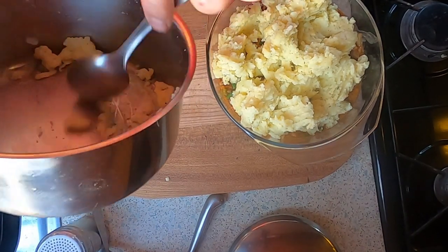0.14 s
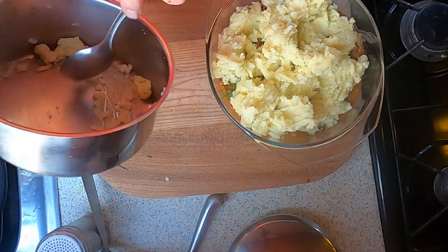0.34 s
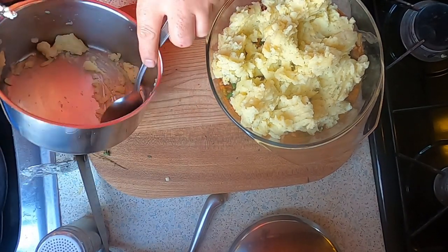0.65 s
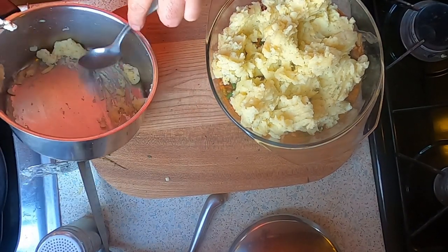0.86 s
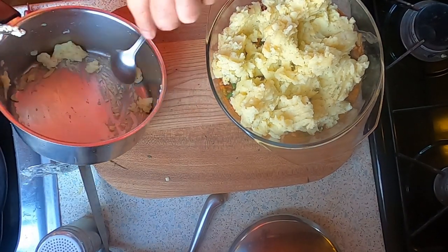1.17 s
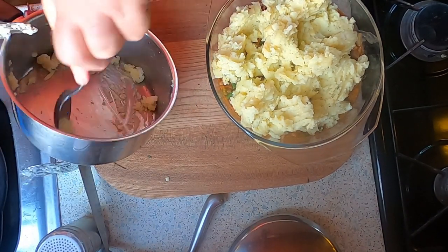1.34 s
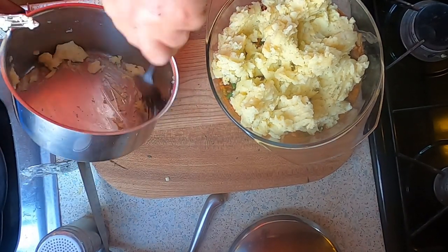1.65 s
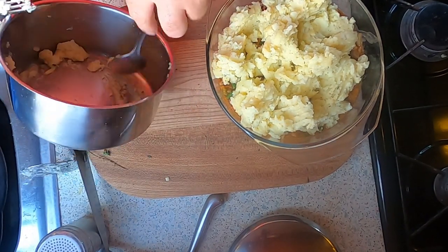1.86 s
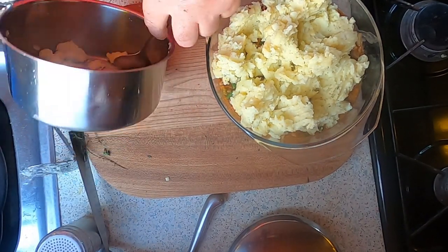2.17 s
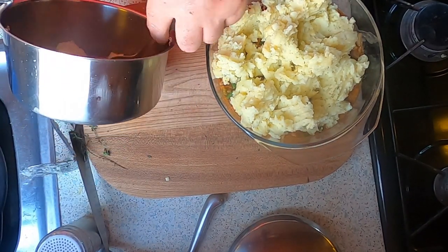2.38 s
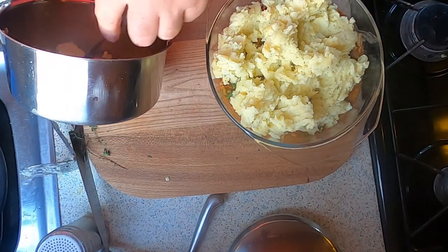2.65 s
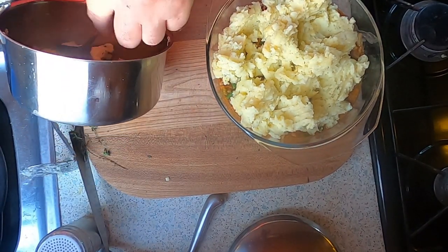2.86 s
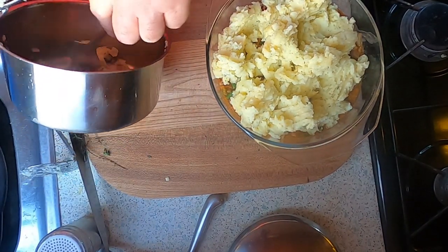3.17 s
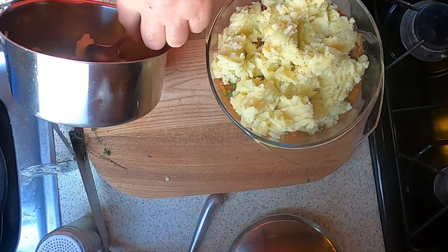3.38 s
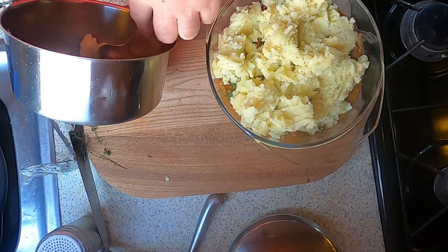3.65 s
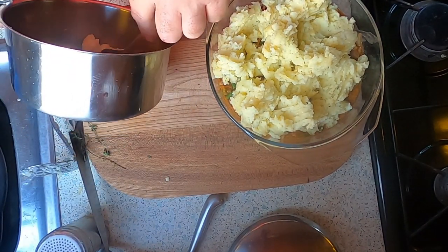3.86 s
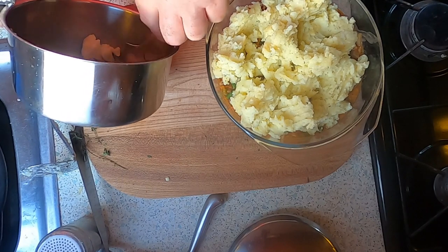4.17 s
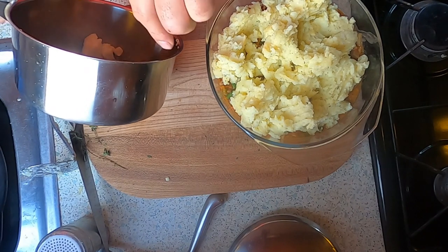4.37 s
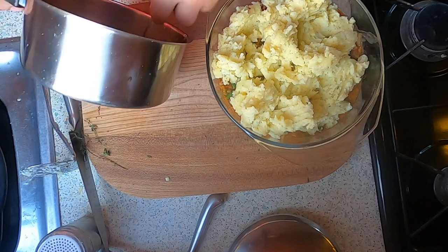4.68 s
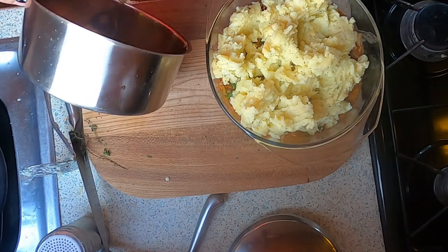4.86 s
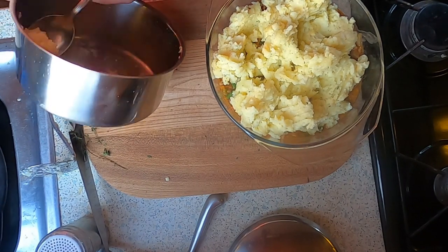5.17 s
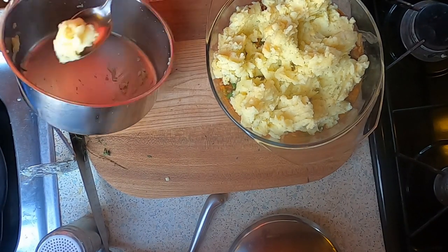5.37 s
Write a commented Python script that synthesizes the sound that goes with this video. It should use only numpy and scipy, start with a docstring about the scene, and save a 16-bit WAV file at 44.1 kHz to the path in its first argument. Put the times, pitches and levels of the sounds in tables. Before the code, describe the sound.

A metal spoon scrapes mashed potato from a steel saucepan in repeated short gritty strokes, with sharp clacks, faint squeals and dull thuds on a wooden board.

```python
"""A small kitchen: close by, a steel spoon scrapes mashed potato out of a steel saucepan on a wooden board.
Most strokes land with a clack, then drag over the metal: tiny random slips drive the damped pan's resonances.
The spoon's bowl sings in gliding narrow bands, blows ring the pan, and the board thuds under its weight.
The rim rings on faintly, the room returns a short echo, and a low rumble and faint air lie under it all."""
import sys
import numpy as np
from scipy import signal
from scipy.fft import rfft, irfft
from scipy.io import wavfile
from scipy.ndimage import uniform_filter1d, map_coordinates

SR = 44100
rng = np.random.default_rng(int(sys.argv[2]) if len(sys.argv) > 2 else 0)


def generate_wav(sig):
    """Save sig (samples, or channels by samples) to the path in sys.argv[1] as 16-bit PCM at SR."""
    pcm = np.round(np.clip(np.atleast_2d(sig).T, -1, 1) * 32767).astype(np.int16)
    wavfile.write(sys.argv[1], SR, pcm)


N = 243564
TIME = np.arange(N) / SR
TAIL = TIME[:SR // 7]  # time within one answer of the pan
LEFT_RIGHT = np.array([[1], [-1]])
LEAN_LEFT = 10 ** (1.2 * LEFT_RIGHT / 20)  # 1.2 dB up on the left, down on the right


def undb(db):
    """Decibels to gain."""
    return 10 ** (np.asarray(db) / 20)


def unit(x):
    """Scale to rms 1."""
    return x / np.sqrt(np.mean(x ** 2))


def noise(points, size):
    """Noise whose spectrum follows (Hz, dB) points, joined over log frequency."""
    hz, db = np.transpose(points)
    f = np.maximum(np.fft.rfftfreq(size, 1 / SR), 1)
    gain = undb(np.interp(np.log(f), np.log(hz), db))
    return irfft(rfft(rng.standard_normal(size)) * gain, size)


def band(x, lo_hz, hi_hz, order=3):
    """Causal band-pass."""
    return signal.sosfilt(signal.butter(order, [lo_hz, hi_hz], "band", fs=SR, output="sos"), x)


def walk(rate_hz, size):
    """Smooth random wandering, spread 1."""
    k = int(SR / rate_hz)
    steps = rng.standard_normal(size // k + 2)
    return unit(uniform_filter1d(np.repeat(steps, k), k))[:size]


def ring(push, response):
    """Play a force through a stereo response."""
    return signal.fftconvolve(np.atleast_2d(push), response, axes=1)[:, :push.shape[-1]]


def add(out, x, s):
    """Mix x into out from time s."""
    i = max(int(s * SR), 0)
    out[..., i:i + x.shape[-1]] += x[..., :N - i]


def delayed(x, seconds):
    """Read x late by a fixed or moving time."""
    return map_coordinates(x, [np.arange(N) - seconds * SR], order=3)


# Drags of the spoon, and at 0.605 s a short slide of the pan on the board.
# Each row: touch in seconds, swell in seconds, length in seconds, level in dB at full
# pressure, level in dB when easing off, grit in dB and weight on the base in dB (both on top of the drag),
# squeal start in Hz, squeal end in Hz, then the squeal and its lower partials in dB relative to the drag,
# before squeal() lifts both by 1 dB.
STROKES = [(0.103, 0.039, 0.19, -40, -36, -6.5, -18.5, 4750, 5450, -5.5, -12.5),
           (0.605, .02, 0.072, -39.5, -43.5, -9, 6.5, 5500, 5500, -18, -21),
           (0.691, 0.028, .2, -40.5, -34.5, -6, -13.5, 5650, 5050, -10.5, 3.5),
           (1.093, 0.024, .12, -36.5, -29, -6.5, -15, 5550, 5400, -23, 1.5),
           (1.473, 0.016, .15, -27.5, -30.5, -8, -14, 5750, 5200, -30, -1.5),
           (1.62, 0.061, 0.14, -36, -33.5, -5.5, -10.5, 5500, 6300, -13, -20),
           (1.775, 0.0091, 0.12, -38, -49.5, -4, -4, 5500, 5400, -24, -27),
           (2.04, 0.018, 0.13, -46.5, -34.5, -4, -14.5, 5500, 5400, -17, -8.5),
           (2.394, 0.061, 0.12, -32, -36, -2.5, -16, 5580, 5250, -7.5, -15),
           (2.749, 0.011, 0.084, -28, -31, -7.5, -15.5, 5780, 5500, -11.5, -14),
           (3.053, 0.017, 0.12, -31.5, -30.5, -8.5, -10, 5350, 5500, -4, -7.5),
           (3.346, 0.051, .11, -34.5, -36, -3, -18, 5500, 5630, -6, -12),
           (3.596, 0.073, 0.11, -33.5, -28.5, -3.5, -23, 5700, 5250, -9, -9),
           (3.891, 0.041, 0.078, -31, -26, -6, -17, 5700, 5250, -2.5, -8),
           (4.144, 0.035, .12, -35, -27.5, -2.5, -20.5, 5600, 5270, -9, -13),
           (4.452, 0.0054, 0.13, -24.5, -33.5, -4.5, -6.5, 5600, 5400, -19, -10),
           (4.571, 0.09, .36, -32.5, -36, -5.5, -9.5, 5300, 5540, -16.5, -11),
           (4.92, 0.046, .22, -30.5, -35.5, -6.5, -13, 5390, 5590, -14.5, -11.5),
           (5.158, 0.078, 0.075, -39, -40.5, 1, -13.5, 5500, 5500, -20, -20)]


def scrapes(force, uneven_db=2.01, press_db=18.5, release_db_per_s=324, lift_s=.16):
    """Each drag or slide presses in, gains grit and lets go; its squeal is strongest midway."""
    slow_grit_db, grit_fade_db_per_s = -8.5, 93  # less grit at the start; grit goes first on lifting
    base_linger_db_per_s = 74  # the base fades that much more slowly than the wall
    out = np.zeros((2, N))
    for (touch, swell, length, full_db, ease_db, grit_db, weight_db,
         start_hz, end_hz, top_db, lower_db) in STROKES:
        t = TIME[:int((length + lift_s) * SR)]
        lifted = np.maximum(t - length, 0)  # seconds since the lift
        travel = np.minimum(t / length, 1)
        press = np.interp(t, [0, min(swell, length), length], [full_db - press_db, full_db, ease_db])
        unevenness = uneven_db * walk(27, SR)[:len(t)]
        pressure = undb(press - release_db_per_s * lifted + unevenness)
        grit = grit_db + slow_grit_db * (1 - travel) ** 2 - grit_fade_db_per_s * lifted
        drag = np.roll(force, -int(touch * SR))[:len(t)] * pressure
        add(out, rub(drag, grit, weight_db + base_linger_db_per_s * lifted), touch)
        arch = np.sqrt(np.abs(np.sin(np.pi * travel)))
        song = squeal(start_hz + (end_hz - start_hz) * travel, top_db, lower_db)
        add(out, song * pressure * arch, touch)
    return out


def friction(edge_s=0.0013874, edge_travel=0.07, edge_echo=0.4, wall_s=.0037, wall_travel=.025,
             wall_echo=0.3, snag_rate_hz=70, snag_db=-5):
    """Slips, judder and the odd harder snag of the spoon's edge, with short gliding echoes; rms 1."""
    grip = 0.25 * undb(4.24 * walk(16, N))  # how firmly the edge catches
    snags = unit(rng.uniform(-1, 1, N) * (rng.random(N) < snag_rate_hz / SR))
    force = slips(rate_hz=1800, spread_db=0.5, flutter_db=2.04, smear=0.61)
    force = force + grip * judder() + undb(snag_db) * snags
    # bending waves come back from the pan's edge and wall; wandering delays make the ripples glide
    force = force + edge_echo * delayed(force, edge_s * (1 + edge_travel * walk(8, N)))
    return unit(force + wall_echo * delayed(force, wall_s * (1 + wall_travel * walk(10, N))))


def slips(rate_hz, spread_db, flutter_db, smear):
    """Friction: dense micro-slips of uneven size, in quick clusters, over the smooth smear of potato."""
    sizes = rng.standard_normal(N) * undb(spread_db * np.clip(rng.standard_normal(N), -2, 2))
    clicks = unit(sizes * (rng.random(N) < rate_hz / SR))
    return unit((clicks + smear * rng.standard_normal(N)) * undb(flutter_db * walk(140, N)))


def judder(rate_hz=380, swing=.16, jitter=.025):
    """The spoon's edge sticks and lets go almost regularly, at a wandering rate."""
    rate = rate_hz * np.exp(swing * walk(14, N) + jitter * walk(300, N))
    turns = np.cumsum(rate) / SR
    pulses = np.diff(np.floor(turns), prepend=0)
    return unit((pulses - np.mean(pulses)) * undb(0.95 * walk(200, N)))


# Registers of the pan, in order thud, base, wall, clack and tick. Each row: low edge in Hz, high edge in Hz,
# stereo side level in dB, left minus right in dB.
REGISTERS = [(61, 590, -18.5, -0.7), (559, 1200, -17, 0.9), (1220, 1780, -17.5, 1.5),
             (1725, 4260, -8.5, 3.5), (4330, 14000, -7.5, 0)]


def rub(force, grit_db, weight_db, damping=1.0, spot_db=2.5, crack_db=1, crack_t60=0.064,
        thud_db=-3.5, base_db=-5.5, wall_db=-8, clack_db=-2.0, flicker_db=1.13):
    """Friction drives the pan at two spots, which take turns and favour different modes."""
    n, out = len(force), 0
    levels_db = [weight_db + thud_db, weight_db + base_db, wall_db, clack_db, grit_db]
    for register, db in zip(REGISTERS, levels_db):
        place = walk(7, n)
        drive = force * undb(db + flicker_db * walk(24, n))
        for share in (np.cos(place), np.sin(place)):
            push = np.pad(drive * share, (0, len(TAIL)))  # room to ring out
            out = out + ring(push, pan_response(register, damping, spot_db, crack_db, crack_t60))
    return out


# Resonances of the damped pan with the spoon on it. Each row: frequency in Hz, width in Hz, level in dB.
PAN = [(81, 14, -16), (114, 4.7, -7.5), (174, 20, -3.5), (260.7, 29, -3.5), (422, 52, -11), (622, 9.7, -10),
       (681.5, 16, -4), (758, 100, -6.5), (923, 18, -9), (1022, 29, -10), (1280, 13, -9.5),
       (1378.4, 44.7, 2.5), (1438, 17, -1), (1525, 50, -7.5), (1705, 45, -23), (1950, 81, -7),
       (2004, 50, -6), (2388, 30, -13), (2411, 91, -10.5), (2766, 79, -9.5), (2788, 32, -10),
       (2897, 12, -9), (2994, 20, -16), (3156, 38, -9), (3284, 70, -9.5), (3607, 59, -12), (3640, 120, -15),
       (3951, 110, -5.5), (3910, 19, -5.5), (4006, 190, -25)]
# High resonances of the spoon pressed against the steel. Each row: frequency in Hz, width in Hz, level in dB.
SPOON = [(4857, 63, -13), (5177, 180, -14), (5200, 54, -23.5), (5606, 94, -15), (5920, 50, -24),
         (6120, 160, -19), (6800, 70, -14), (7100, 296, -21), (7100, 39, -37.5), (8360, 150, -24),
         (8930, 118, -19), (9420, 150, -26.5), (10640, 97, -31), (12350, 380, -36.5), (12898, 180, -44)]
# Spectrum of the many weak, short-lived resonances between those. Each row: frequency in Hz, level in dB.
CRACK = [(60, -24.5), (200, -18), (330, -20.5), (500, -22.5), (1100, -36), (1600, -24.5), (3500, -24),
         (4500, -26.5), (6000, -26), (7900, -36.5), (9500, -33.5), (11000, -46), (13500, -45),
         (15500, -70.5)]


def pan_response(register, damping, spot_db, crack_db, crack_t60, detune=0.0066):
    """One register's answer to a tap, energy 1; the spot that is touched favours some modes over others."""
    lo, hi, side_db, balance_db = register
    modes = [m for m in PAN + SPOON if lo <= m[0] < hi]
    hz, width, db = np.array(modes).T[:, :, None]
    width = width * damping
    hz = hz * (1 + detune * rng.standard_normal(hz.shape))  # the spoon's load shifts each mode a little
    size = 2 * np.pi * width / SR * undb(db + spot_db * rng.standard_normal(hz.shape))
    waves = size * np.exp((2j * np.pi * hz - np.pi * width) * TAIL)
    fade = undb(-60 * TAIL / crack_t60)
    fade = fade / np.linalg.norm(fade)

    def one_pattern():
        """Modes in unrelated phases, with fading noise between them."""
        phases = np.exp(2j * np.pi * rng.random(len(hz)))
        return np.imag(phases @ waves) + undb(crack_db) * fade * noise(CRACK, len(TAIL))

    # every mode radiates in its own pattern, so sum and difference of the two ears are unrelated
    mid, side = one_pattern(), one_pattern()
    pair = (mid + LEFT_RIGHT * undb(side_db) * side) * undb(LEFT_RIGHT * balance_db / 2)
    pair = band(pair, lo, hi)
    return pair / np.sqrt(np.sum(pair ** 2) / 2)


# The bowl's lower partials. Each row: ratio to the squeal's pitch, level in dB relative to one another.
LOWER_PARTIALS = [(.372, 1), (.455, 0), (.533, -3), (0.654, -2), (.77, -7), (.88, -11.5)]


def squeal(hz, top_db, lower_db, wander=.022, turns_db=5, top_gain_db=1, lower_gain_db=1):
    """The spoon's bowl sings; its partials glide together, bend and take turns as the contact point shifts."""
    n, lower = len(hz), 0
    for ratio, db in LOWER_PARTIALS:
        partial = sing(hz * ratio * (1 + wander * walk(16, n)))
        lower = lower + partial * undb(db + turns_db * walk(18, n))
    top = undb(top_db + top_gain_db) * sing(hz)
    return (top + undb(lower_db + lower_gain_db) * unit(lower)) * LEAN_LEFT


def sing(hz, width_hz=90, waver=0.0059):
    """A narrow resonance of the spoon, fed by friction, on a gliding pitch; rms 1."""
    n = len(hz)
    feed = walk(2 * width_hz, n) + 1j * walk(2 * width_hz, n)
    turns = np.cumsum(hz * (1 + waver * walk(90, n))) / SR
    return unit(np.real(feed * np.exp(2j * np.pi * turns)))


# The spoon strikes the steel. Each row: start in seconds, contact chatter in ms, level in dB, base in dB
# relative to it, brightness in dB, pinging mode in Hz, its level in dB relative to the blow.
CLACKS = [(0.1035, 0.75, -21.5, -18.5, 0.5, 2690, -3.5), (0.262, 8.2, -42.5, -4, -2.5, 3300, -6.5),
          (0.691, 1.9, -22, -16, -1, 3798, -1), (1.0918, .5, -26.5, -6.5, 0, 2850, -3),
          (1.259, 2.4, -45, 3, -14, 2270, -11.5), (1.4707, 5.8, -25.5, -4.5, 2, 2410, -4.5),
          (1.779, 1, -50.5, 10.5, -12, 3660, 6), (2.04, 0.39, -27, -4.5, 1.5, 3280, -11.5),
          (2.151, 3.9, -44.5, -5, 12.5, 3130, 4), (2.284, 4.9, -51, -15.5, -11, 1467, -10),
          (2.7478, 2.2, -27, -2, -3, 2700, -11.5), (2.842, 4.9, -24.5, -13.5, -13, 2336, -10.5),
          (3.0506, 0.9, -33, -2.5, 7, 3860, 4.5), (3.1287, 5.7, -29, -3, 5.5, 4080, 2),
          (3.347, 0.37, -22.5, -6.5, -5.5, 3263, -11), (3.597, 4.7, -26, -9.5, -5, 3260, -5.5),
          (3.892, 1.5, -44.5, -6, -8, 3020, -1), (3.912, 11, -39, -15, 4, 2740, -1),
          (3.975, 8.4, -30.5, -7, -13, 2800, -13), (3.992, 0.92, -26.5, -19, -21, 2850, -14),
          (4.1411, 0.89, -34.5, -5.5, -3, 3260, 2), (4.2467, 13, -40, -10.5, 10.5, 3845, 12),
          (4.45, 39, -24, -7, 1.5, 5660, -8), (5.1186, 3.7, -36, -39, 0.5, 3220, -2)]


def clacks(damping=1.02, spot_db=2, crack_db=3, crack_t60=0.065, chatter=0.089,
           thud_db=-12, clack_db=-1.0, tick_db=-8.5, ping_t60=0.062):
    """Each blow rings all registers of the pan, with its own brightness, and adds one pinging mode."""
    out = np.zeros((2, N))
    for s, chatter_ms, db, base_db, bright_db, ping_hz, ping_db in CLACKS:
        push = tap(chatter_ms, chatter)
        shares_db = [base_db + thud_db, base_db, 0, bright_db + clack_db, bright_db + tick_db]
        for register, share_db in zip(REGISTERS, shares_db):
            answer = ring(push, pan_response(register, damping, spot_db, crack_db, crack_t60))
            add(out, struck(answer, db + share_db), s)
        ping = np.sin(2 * np.pi * ping_hz * TAIL) * undb(-60 * TAIL / ping_t60)
        add(out, struck(ping, db + ping_db) * LEAN_LEFT, s)
    return out


def tap(chatter_ms, chatter):
    """The force of a blow: a sharp push and a short chatter of the contact."""
    rattle = rng.standard_normal(len(TAIL)) * np.exp(-(TAIL * 1000 / chatter_ms) ** 2)
    return (TAIL == 0) + chatter * rattle


def struck(x, db, knock_s=.03):
    """Set the rms level of a blow over its first moments."""
    return x * undb(db) / np.sqrt(np.mean(x[..., :int(knock_s * SR)] ** 2))


def skids(force, skid_db=-9.5, fade_db_per_s=300, grit_db=-10, lean_db=3):
    """After each clack the spoon skids on, leaning on the base as the blow did."""
    push, weight_db = np.zeros(N), np.zeros(N)
    for s, _, db, base_db, bright_db, *_ in CLACKS:
        add(push, undb(db + bright_db / 2 + skid_db - fade_db_per_s * TAIL), s)
        weight_db[int(s * SR):] = base_db + lean_db  # holds until the next clack
    return rub(force * push, grit_db, weight_db)[:, :N]


# The pan bumps down on the wooden board. Each row: start in seconds, thud in dB, top of the thud in Hz,
# hollow knock of the base in dB relative to the thud.
THUMPS = [(0.604, -25, 620, 2.5), (0.654, -30.5, 400, -3.5), (0.918, -51, 398, 7.5), (1.52, -34.5, 430, -1),
          (2.842, -27, 330, -8.5), (3.1289, -25.5, 332, -8.5), (4.462, -25.5, 216, -5.5)]


def thumps(damping=1.07, spot_db=2, crack_db=3, crack_t60=0.11, thud_t60=0.24, chatter_ms=5.1,
           chatter=0.096, board_lag_s=.0023, low_hz=85, soft_hz=720, wall_db=-9, clack_db=-26):
    """The board answers the pan's weight with a dull, lingering thud, just after the steel base knocks."""
    out = np.zeros((2, N))
    for s, db, top_hz, knock_db in THUMPS:
        push = tap(chatter_ms, chatter)
        thud = ring(push, pan_response(REGISTERS[0], damping, spot_db, crack_db, thud_t60))
        add(out, struck(band(thud, low_hz, top_hz, order=2), db), s + board_lag_s)
        soft = band(push, low_hz, soft_hz)  # wood cushions the blow
        for register, share_db, drive in zip(REGISTERS[1:], [0, wall_db, clack_db], [soft, push, push]):
            answer = ring(drive, pan_response(register, damping, spot_db, crack_db, crack_t60))
            add(out, struck(answer, db + knock_db + share_db), s)
    return out


def handling(force, db=-67, swell_db=3, grit_db=-14, weight_db=1, low_hz=100, soft_hz=600):
    """The held pan shifts faintly and dully on the board all the while: soft friction that swells and ebbs."""
    soft = band(force, low_hz, soft_hz, order=1)
    return rub(soft * undb(db + swell_db * walk(6, N)), grit_db, weight_db)[:, :N]


# Free ringing of the rim. Each row: frequency in Hz, level in dB before the coupling, t60 in seconds.
RIM = [(800, -40, 0.61), (1130, -36, 1.2), (1280, -33.5, 1.3), (2040, -33.5, .4), (2783, -24, 0.73),
       (3160, -40.5, .6), (3919, -21.5, 0.35), (5243, -43, .4)]


def rim(pan, coupling_db=-55):
    """The free rim picks up the pan's vibration and rings on faintly."""
    t = TIME[:SR]
    response = sum(undb(db - 60 * t / t60) * np.sin(2 * np.pi * hz * t) for hz, db, t60 in RIM)
    return ring(pan.mean(axis=0), np.array([response, response])) * undb(coupling_db)


def kitchen(x, wet_db=-14, t60=0.17, treble_t60=0.13, first_wall_s=0.0033):
    """Worktop, cupboards and tiles return a short, dense echo; only its bass is alike at both ears."""
    t = TIME[:SR // 2]
    hiss = rng.standard_normal((2, len(t)))
    bass = band(rng.standard_normal(len(t)), 88, 900, order=2)
    body = bass + band(hiss, 430, 4000, order=2)
    treble = band(hiss, 4000, 15000, order=2)
    echo = body * undb(-60 * t / t60) + treble * undb(-60 * t / treble_t60)
    echo *= np.clip(t / first_wall_s - 1, 0, 1)  # silent until the first wall answers
    return x + undb(wet_db) * ring(x, echo / np.sqrt(np.sum(echo ** 2) / 2))


# Course of the low rumble. Each row: time in seconds, level in dB.
RUMBLE = [(0.0, -50), (0.54, -60.5), (0.63, -39), (0.81, -51), (2.24, -48.5), (2.83, -45), (2.86, -39.5),
          (3.43, -48), (4.18, -42.5), (5.07, -45), (5.24, -37.5), (5.3, -47.5), (5.49, -38.5), (5.52, -35)]
# Spectrum of the rumble, before scaling to rms 1. Each row: frequency in Hz, level in dB.
RUMBLE_COLOUR = [(15, -25.5), (25, -9.5), (36, 6.5), (46, -9.5), (58, 3), (75, -2.5), (100, -19),
                 (122, -10.5), (150, -16), (210, -20.5), (320, -30.5), (600, -68.5)]
# Spectrum of the room air, before scaling to rms 1. Each row: frequency in Hz, level in dB.
AIR = [(100, -19), (400, -5), (1300, -9.5), (2500, -8.5), (6000, -13), (15000, -40.5)]


def background(side_db=-16.0, air_db=-71):
    """Shaped noise: a low rumble, nearly alike at both ears, and faint room air."""
    level_db = np.interp(TIME, *np.transpose(RUMBLE))
    middle, side = unit(noise(RUMBLE_COLOUR, N)), unit(noise(RUMBLE_COLOUR, N))
    rumble = middle + undb(side_db) * LEFT_RIGHT * side
    air = unit(np.array([noise(AIR, N) for _ in range(2)]))
    return rumble * undb(level_db) + undb(air_db) * air


def scene(left_lag_s=.00001):
    """Spoon and pan in the kitchen; their sound reaches the left ear a trace later."""
    force = friction()
    left, right = scrapes(force) + skids(force) + clacks() + thumps() + handling(force)
    pan = np.array([delayed(left, left_lag_s), right])
    return kitchen(pan + rim(pan)) + background()


def record(dry, top_hz=15000):
    """The recorder stops at full scale and cuts the top."""
    top_cut = signal.ellip(8, .2, 80, top_hz, fs=SR, output="sos")
    return signal.sosfilt(top_cut, np.clip(dry, -1, 1))


dry = scene()
out = record(dry)
generate_wav(out)
```